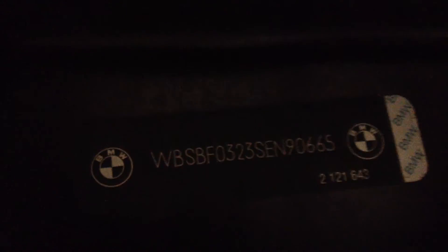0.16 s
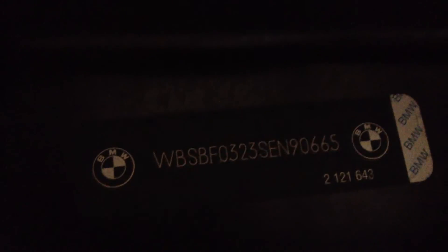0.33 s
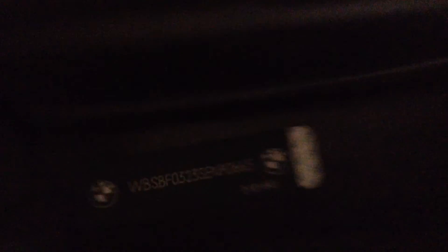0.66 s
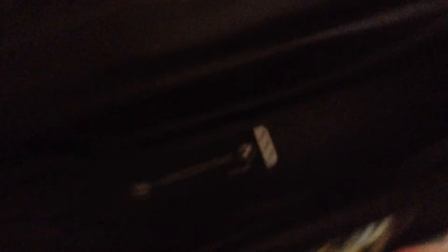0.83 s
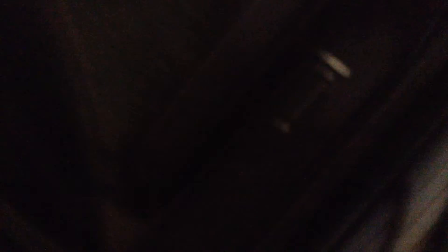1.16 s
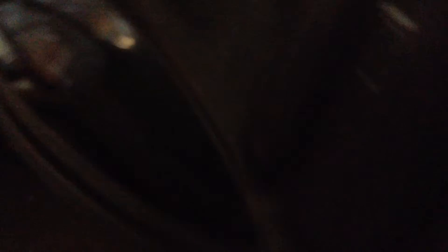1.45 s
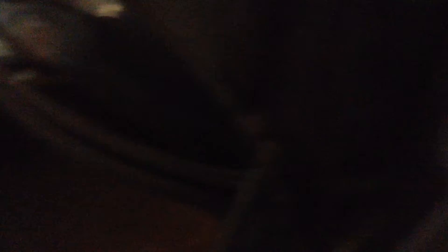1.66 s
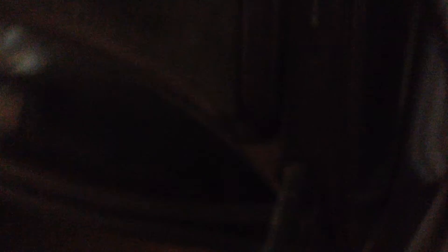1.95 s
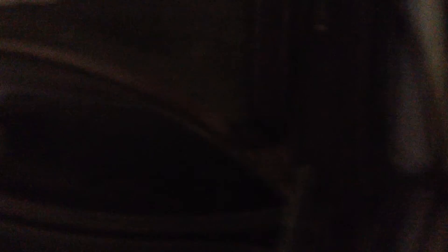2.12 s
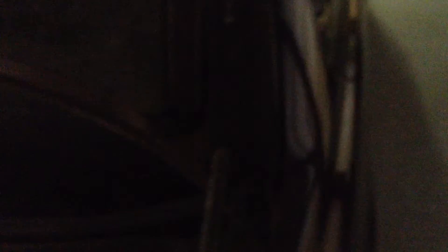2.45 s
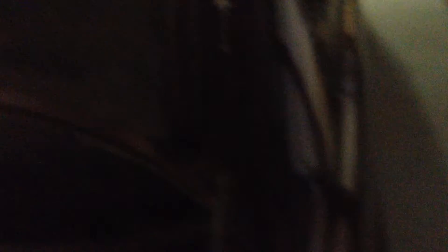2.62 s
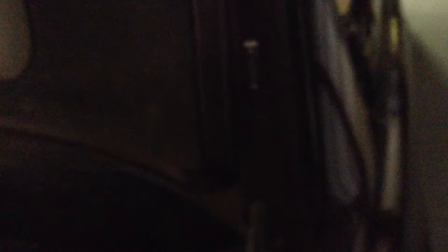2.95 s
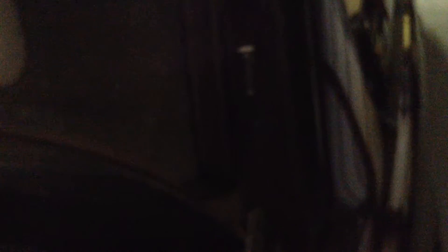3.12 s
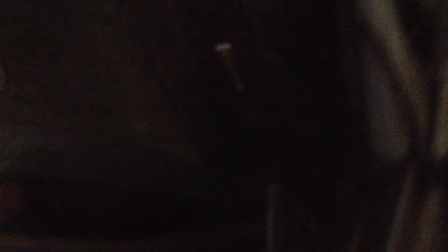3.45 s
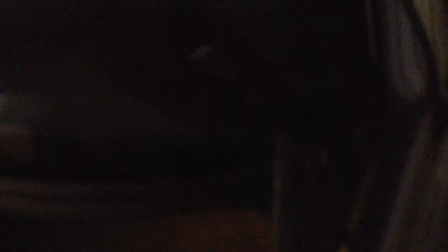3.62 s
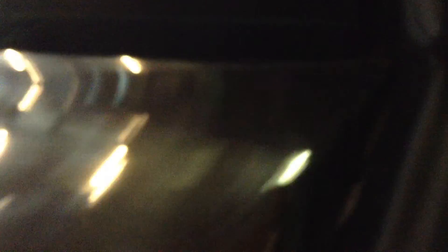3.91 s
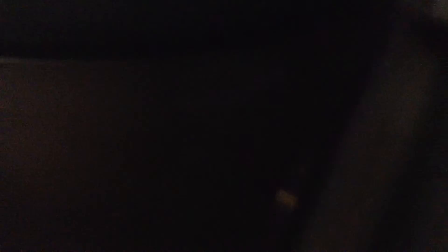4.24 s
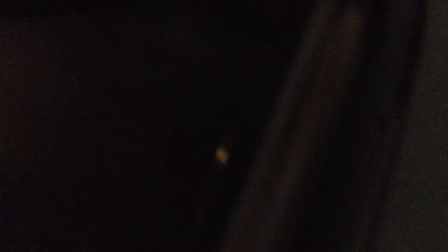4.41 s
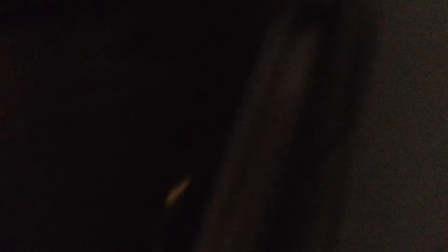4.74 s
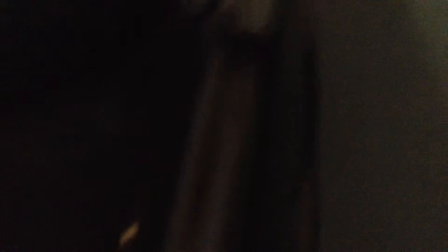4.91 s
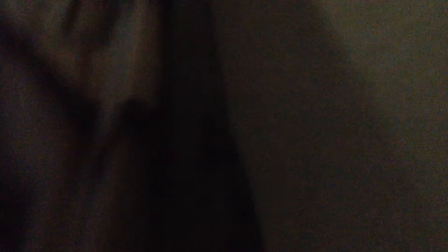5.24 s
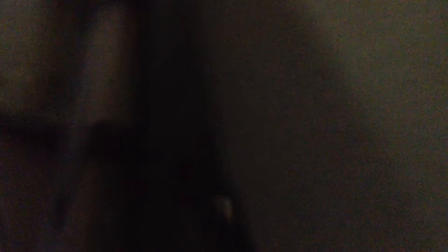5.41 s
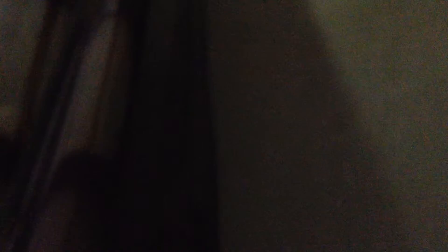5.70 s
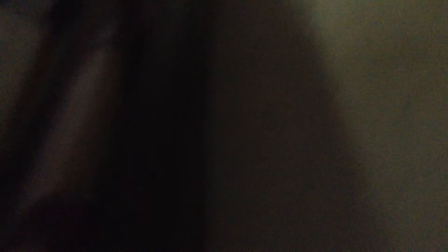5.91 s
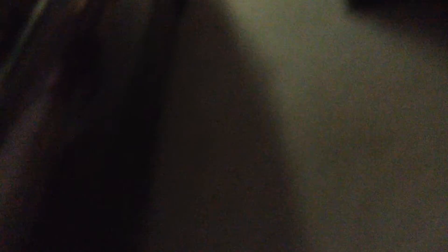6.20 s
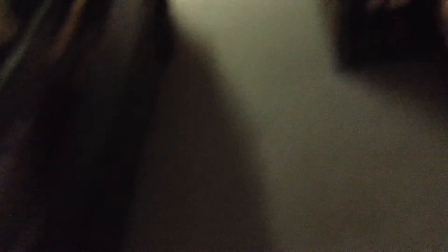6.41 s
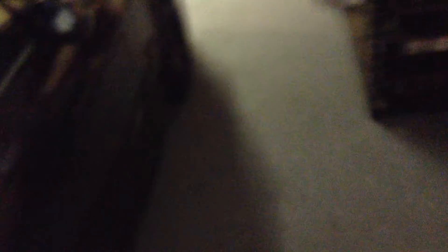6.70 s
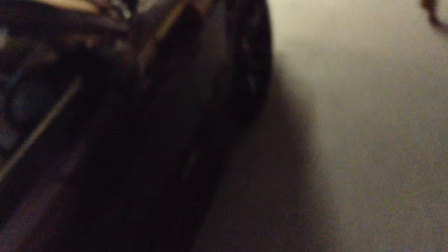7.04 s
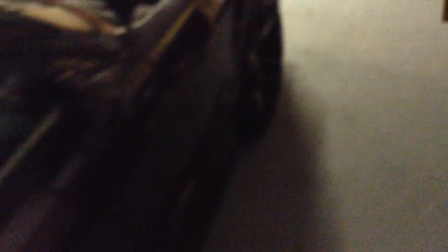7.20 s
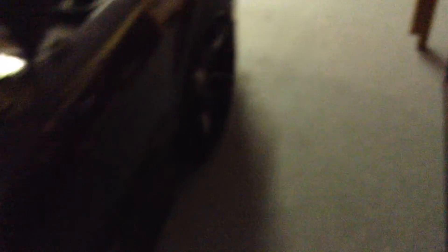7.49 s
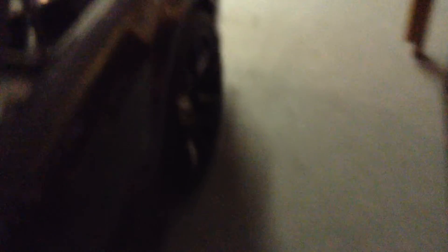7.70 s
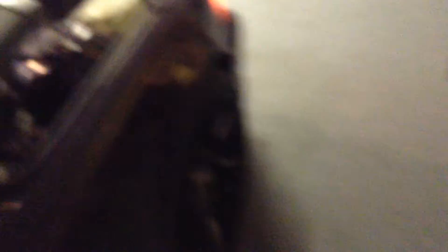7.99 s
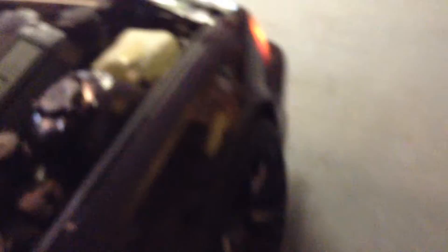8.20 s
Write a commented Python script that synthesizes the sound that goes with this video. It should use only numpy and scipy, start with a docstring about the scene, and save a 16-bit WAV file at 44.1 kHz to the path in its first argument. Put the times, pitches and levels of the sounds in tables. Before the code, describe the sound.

A six-cylinder car engine idles throughout, heard from a close, moving handheld microphone in a garage. From 0 s a low, humming exhaust drone pulses rapidly and a little unevenly, with a boxy panel buzz, block rumble, soft belt and intake hiss and a faint whine. Around 1.3 to 1.9 s a shoe scuffs the floor in several gritty drags, the strongest near 1.5 s, with thin squeaks. Two bright trim ticks come at about 3.7 and 3.9 s. At 4.3 s the car door slams: a very loud, tight cluster of latch cracks, metallic body ringing and a short garage tail, after which the idle seems briefly pushed down. From roughly 5.3 to 6.5 s the microphone moves out along the flank; the deep drone thins and fluctuates while fluttering hiss and airy engine bay noise become clearer, continuing until the end at 8.4 s.

```python
"""In a garage, close by a car's open door and then out along its flank, a six-cylinder engine idles.
Each firing strikes the exhaust and body resonances; shaped noise makes the gas, rumble and belt hiss, and
resonances and a crank-locked tone make a faint whine. Noise drags and squeaks scuff a shoe, bright bursts
tick twice in the trim, and the latch slams: cracks of noise, ringing door modes and a short garage tail."""
import sys
import numpy as np
from scipy import signal
from scipy.fft import rfft, irfft, next_fast_len
from scipy.io import wavfile

SR = 44100
rng = np.random.default_rng(int(sys.argv[2]) if len(sys.argv) > 2 else 0)


def master_out(mix):
    """Clip the mix to full scale and print it as 16-bit PCM to the path in sys.argv[1]."""
    frames = np.transpose(np.atleast_2d(mix))
    ceiling = np.clip(frames, -1, 1)
    pcm = np.round(ceiling * 32767).astype(np.int16)
    wavfile.write(sys.argv[1], SR, pcm)


N = 368676
LEAD = SR // 4   # samples of running-in before the start

# what the microphone's place does: (time [s], drone level [dB], second pipe against first [dB],
# standing wave near 225 Hz [dB], openness toward the engine bay [dB])
PLACE = [(0.0, -14.5, 3.5, -0.5, 0.5), (0.7, -15, 1.5, -2, 0.5), (1.39, -18, 0.5, -7.5, 1),
         (1.68, -16, 0, -3.5, .5), (2.09, -16.5, -1, -1.5, 0.5), (2.65, -16.5, -2, 3, 0.5),
         (4.1, -17.5, 1, -0.5, 0), (4.63, -16.5, -1, -0.5, 0), (5.26, -16.5, 2.5, 3.5, 0.5),
         (5.68, -19.5, 2.5, 5, 0.5), (6.12, -26.5, 6, 10.5, 1.5), (6.54, -30.5, 1.5, -0.5, 2),
         (7.22, -22, 0, 4, 3.5), (7.59, -21.5, -12.5, 1.5, 3), (7.99, -23, 0, -0.5, 4.5),
         (8.36, -26, 5, 9.5, 5.5)]
# one row a cylinder: (timing offset [ms], strength in each of the four pipes [dB] x 4)
CYLINDERS = [(-0.7, -26.5, -26, -37.5, -66), (-0.79, -26.5, -74, -77, -64), (-1.53, -30, -27.5, -38, -74),
             (-1.23, -28, -31, -49, -68), (-1.23, -29, -25, -48, -50.5), (-0.38, -26, -30.5, -43, -49.5)]
# blows of the door latch: (time [s], relative level at 2 kHz [dB], tilt [dB per octave])
LATCH = [(4.310, -12.5, 0.5), (4.318, -14, 1), (4.326, -12.5, 1.5), (4.337, -21, -6), (4.351, -31, 6.5)]

SILL_LEAVE_S, SILL_CLEAR_S = 0.49, 1.2   # the microphone draws back from the door sill
FLANK_FROM_S, FLANK_AT_S = 5.3, 6.1      # and steps out along the car's flank


def from_db(db):
    """Decibels to amplitude gain."""
    return 10 ** (np.asarray(db) / 20)


def rms_one(x):
    """Scale to unit rms."""
    return x / np.sqrt(np.mean(x ** 2) + 1e-20)


def in_time(rows, lead=0):
    """Table columns joined by straight lines, one value a sample."""
    s, *columns = np.transpose(rows)
    return [np.interp(np.arange(-lead, N) / SR, s, c) for c in columns]


def at_hz(points, hz):
    """Read a curve on a log-frequency axis."""
    point_hz, value = np.array(points).T
    return np.interp(np.log(hz), np.log(point_hz), value)


def ramp(start_s, end_s):
    """From 0 to 1 between two times."""
    return np.clip((np.arange(N) / SR - start_s) / max(end_s - start_s, 1e-3), 0, 1)


def drift(rate_hz):
    """Slow random wander of unit rms: low-passed noise made at every 40th sample, then joined up."""
    r = np.exp(-80 * np.pi * rate_hz / SR)
    noise = rng.standard_normal(N // 40 + 2002)
    slow = signal.lfilter([1], [1, -2 * r, r * r], noise)[2000:]
    return np.interp(np.arange(N) / 40, np.arange(len(slow)), rms_one(slow))


def resonate(x, hz, width_hz):
    """The same two-pole resonance twice, for dark valleys."""
    r = np.exp(-np.pi * width_hz / SR)
    row = [(1 - r * r) / 2, 0, (r * r - 1) / 2, 1, -2 * r * np.cos(2 * np.pi * hz / SR), r * r]
    return signal.sosfilt([row, row], x)


def ringing_noise(hz, width_hz):
    """Noise through a narrow resonance, unit rms."""
    return rms_one(resonate(rng.standard_normal(N), hz, width_hz))


def coloured(spectrum):
    """White noise shaped to a spectrum, falling away under its lowest point; unit rms."""
    size = next_fast_len(N)
    hz = np.maximum(np.arange(size // 2 + 1) * SR / size, 1)
    gain = from_db(at_hz(spectrum, hz)) * np.minimum(hz / spectrum[0][0], 1) ** 4
    return rms_one(irfft(rfft(rng.standard_normal(size)) * gain, size)[:N])


def heard(db, sill_db, flank_db, share):
    """Gain of an engine layer at the moving microphone: sill, flank, standing wave, wander of the hand."""
    wave_db = in_time(PLACE)[2]
    sill = 1 - ramp(SILL_LEAVE_S, SILL_CLEAR_S)
    flank = ramp(FLANK_FROM_S, FLANK_AT_S)
    return from_db(db + sill_db * sill + flank_db * flank + share * wave_db + 0.7 * drift(1.33))


def crank():
    """Four-stroke cycles (two turns each) counted from the start."""
    # crank speed: (time [s], speed [rpm])
    crank_speed = [(0.0, 717.2), (0.77, 727.4), (1.16, 757.0), (2.25, 743.7), (2.78, 735.3), (3.08, 747.6),
                   (3.49, 750.2), (4.03, 725.8), (4.31, 741.2), (4.52, 730.6), (5.0, 738.9), (5.33, 716.4),
                   (5.52, 738.3), (6.15, 759.9), (7.22, 745.5), (7.5, 736.8), (8.36, 752.4)]
    cycles = np.cumsum(in_time(crank_speed, lead=LEAD)[0] / 120) / SR
    return cycles - cycles[LEAD]


def firings(late_ms):
    """Six firings a cycle, each with its cylinder's timing offset and a random lateness or earliness."""
    cycles = crank()
    firing = np.arange(np.ceil(6 * cycles[0]), 6 * cycles[-1]).astype(int)
    cylinder = firing % 6
    offset_ms = np.array(CYLINDERS)[cylinder, 0] + late_ms * rng.standard_normal(len(firing))
    fired = np.interp(firing / 6, cycles, np.arange(N + LEAD)) + offset_ms * SR / 1000
    return fired, cylinder


def exhaust(fired, cylinder, uneven_db):
    """Each firing strikes four resonances of exhaust and body, after a path delay to each."""
    # exhaust and body resonances: (frequency [Hz], width of each pass [Hz], path delay [ms])
    pipes = [(160.25, 21.2, 0.02), (179.46, 18.3, 14.05), (233.2, 27, 25.52), (410.2, 18.4, 0.62)]
    # on the flank the cylinders sound more alike in the first three pipes
    sample = np.clip(fired - LEAD, 0, N - 1).astype(int)
    even = 0.66 * ramp(FLANK_FROM_S, FLANK_AT_S)[sample]
    silencer = signal.butter(2, 125, "high", fs=SR, output="sos")   # little passes below the pipes
    rings = []
    for k, (hz, width_hz, path_ms) in enumerate(pipes):
        strength = from_db(np.array(CYLINDERS)[cylinder, k + 1])
        if k < len(pipes) - 1:
            strength = strength + even * (strength.mean() - strength)
        at = np.maximum(np.round(fired + path_ms * SR / 1000).astype(int), 0)
        pulses = np.zeros(N + 2 * LEAD)
        pulses[at] = strength * from_db(uneven_db[k] * rng.standard_normal(len(fired)))
        ring = signal.sosfilt(silencer, resonate(pulses + 1e-18, hz, width_hz))
        rings.append((-1) ** k * ring[LEAD:LEAD + N])
    drone_db, second_db = in_time(PLACE)[:2]
    scale = np.std(rings[0] + rings[1])
    drone = from_db(drone_db) * (rings[0] + from_db(second_db) * rings[1]) / scale
    third = heard(db=-32, sill_db=-2, flank_db=-2.5, share=0.34) * rms_one(rings[2])
    fourth = heard(db=-39, sill_db=-2.5, flank_db=-0.5, share=0.09) * rms_one(rings[3])
    return drone + third + fourth


def engine_orders():
    """Pure tones at whole multiples of the cycle rate, locked to the crank."""
    # low tones: (multiple of the cycle rate, level [dB rms])
    low_orders = [(9, -69), (12, -65), (15, -82)]
    # upper tones, multiple of the cycle rate: (level clear of the sill [dB rms], change at the sill [dB],
    # change on the flank [dB], share of the standing wave)
    upper_orders = {18: (-64.5, -24, 19.5, 0.2), 36: (-42.5, -22, -2, 1.56), 39: (-31, 3, -3.5, .5)}
    turn = 2 * np.pi * crank()[LEAD:]
    tones = sum(from_db(db) * np.sin(k * turn) for k, db in low_orders)
    tones += sum(heard(*row) * np.sin(k * turn) for k, row in upper_orders.items())
    return np.sqrt(2) * tones


def panel(fired, cylinder):
    """A panel rings near 310 Hz, knocked hardest once a turn, and rattles with noise at the firing rate."""
    # how hard each cylinder's firing shakes the panel: (level [dB])
    panel_strikes = [-2, -13.5, -0.5, -7, -15, 0.5]
    knocks = np.zeros(N + 2 * LEAD)
    at = np.round(fired + 14.0 * SR / 1000).astype(int)   # 14 ms path
    strike_db = np.array(panel_strikes)[cylinder] + 1.5 * rng.standard_normal(len(fired))
    knocks[at] = from_db(strike_db)
    ring = rms_one(resonate(knocks + 1e-18, hz=307.3, width_hz=58)[LEAD:LEAD + N])
    stir = rng.standard_normal(N) * from_db(3.0 * np.cos(6 * 2 * np.pi * crank()[LEAD:]))
    rattle = from_db(-7) * rms_one(resonate(stir, hz=303.5, width_hz=81))
    return heard(db=-37.5, sill_db=4.5, flank_db=0.5, share=-0.48) * (ring + rattle)


def exhaust_gas():
    """Turbulent gas, as shaped noise, fills in between the orders and follows the drone."""
    # spectrum of the gas: (frequency [Hz], relative density [dB])
    gas_spectrum = [(30, -44), (100, -30), (140, -21), (185, -28), (240, 8.5), (300, -4.5), (420, 4),
                    (520, -39)]
    return from_db(in_time(PLACE)[0] - 22.5) * coloured(gas_spectrum)


def engine(uneven_db, late_ms):
    """The same firings drive the exhaust and the panel; crank tones and gas join them."""
    fired, cylinder = firings(late_ms)
    return exhaust(fired, cylinder, uneven_db) + engine_orders() + panel(fired, cylinder) + exhaust_gas()


def whine():
    """Narrow resonances of the ancillaries, and the alternator's tone following the crank through its belt."""
    # ancillary resonances: (frequency [Hz], width of each pass [Hz], relative level [dB])
    ancillaries = [(717, 36, -2.5), (2218, 144, -1), (6270, 350, -13)]
    rings = sum(from_db(db) * ringing_noise(hz, width_hz) for hz, width_hz, db in ancillaries)
    slip = 1.9 * drift(3.4)   # belt slip blurs the pitch
    alternator = np.sin(2 * np.pi * 199 * crank()[LEAD:] + slip)
    return rings + from_db(3.5 + 2.5 * drift(8.4)) * alternator


def engine_bay():
    """Block rumble, belt and intake hiss and higher air noise, fluttering together, over the whine."""
    # spectrum of the block's rumble: (frequency [Hz], relative density [dB])
    rumble_spectrum = [(260, 2), (450, 7.5), (640, -3), (692, -1), (1200, -1), (1340, -6), (2500, -29.5),
                       (3250, -39), (5500, -120)]
    # spectrum of the belt and intake hiss: (frequency [Hz], relative density [dB])
    hiss_spectrum = [(880, -29), (1500, -1), (1890, -2), (2270, -2.5), (2460, -1), (4450, -2.5), (4790, -3),
                     (6470, -2.5), (9000, -10.5), (11700, -21.5), (19800, -120)]
    # spectrum of the higher air noise: (frequency [Hz], relative density [dB])
    air_spectrum = [(5000, -39), (8500, -1), (11900, -2.5), (14200, -12.5), (15300, -13.5)]
    open_db = in_time(PLACE)[3]
    sill = 1 - ramp(SILL_LEAVE_S, SILL_CLEAR_S)
    # base level [dB], change at the sill [dB], share of the openness
    rumble_db = -41.5 + 4.8 * sill + 0.65 * open_db
    hiss_db = -41 + 0.28 * sill + 0.88 * open_db
    air_db = -51 - 1.5 * sill + 1.6 * open_db
    whine_db = -54 + 0.66 * open_db
    flutter = drift(6.0)
    rumble = from_db(rumble_db + 0.5 * flutter + 0.6 * drift(9.0)) * coloured(rumble_spectrum)
    hiss = from_db(hiss_db + 0.39 * flutter + 0.43 * drift(18.0)) * coloured(hiss_spectrum)
    air = from_db(air_db + 0.45 * flutter) * coloured(air_spectrum)
    return rumble + hiss + air + from_db(whine_db) * whine()


def garage_hum():
    """Low hum of the garage, as shaped noise, a little fainter out on the flank."""
    # spectrum of the hum: (frequency [Hz], relative density [dB])
    hum_spectrum = [(20, -6), (45, -6), (70, 7), (110, 6), (140, -16), (200, -50)]
    return from_db(-55.5 - 4 * ramp(FLANK_FROM_S, FLANK_AT_S)) * coloured(hum_spectrum)


def scuff():
    """Gritty drags of a shoe that rise, sag and fall away, with a ringing sole and its thin squeaks."""
    # spectrum of the drag: (frequency [Hz], relative density [dB])
    drag_spectrum = [(120, -30), (230, 0), (360, 8), (520, -2.5), (800, -13), (1200, -8), (1700, -15.5),
                     (2250, -12.5), (3200, -22), (5000, -41)]
    # drags over the floor: (time [s], level [dB], length [s])
    shoe_drags = [(1.303, -33.5, 0.054), (1.504, -25, 0.081), (1.628, -28.5, 0.053), (1.75, -34.5, .05)]
    # squeaks of the sole: (time [s], level [dB])
    sole_squeaks = [(1.33, -45), (1.55, -40), (1.66, -41)]
    rise_s, fall_s, sag_db, squeak_s = 0.041, 0.053, 3.5, 0.03
    t = np.arange(N) / SR
    drag = np.zeros(N)
    for s, db, long in shoe_drags:
        rise = ramp(s - rise_s, s) ** 2
        fall = np.exp(-np.maximum(t - s - long, 0) / fall_s)
        drag += from_db(db - sag_db * ramp(s, s + long)) * rise * fall
    peep = sum(from_db(db) * np.exp(-np.abs(t - s) / squeak_s) for s, db in sole_squeaks)
    grit = from_db(1.5 * drift(40.0))
    squeak = ringing_noise(hz=6580, width_hz=650)
    sole = from_db(-20) * ringing_noise(hz=2220, width_hz=160)
    return grit * (drag * (coloured(drag_spectrum) + sole) + peep * squeak)


def ticks():
    """Trim ticks: short high-passed noise bursts with a fast exponential decay."""
    # ticks of the trim: (time [s], nominal peak [dB], lowest frequency [Hz], t60 [s])
    trim_ticks = [(3.722, -32, 2980, 0.16), (3.873, -24, 4000, .03)]
    out = np.zeros(N)
    age = np.arange(SR // 4) / SR
    for s, db, low_hz, t60 in trim_ticks:
        # the noise peaks some 5 dB over its rms
        burst = rng.standard_normal(len(age)) * from_db(db - 5 - 60 * age / t60)
        start = round(s * SR)
        high_pass = signal.butter(2, low_hz, "high", fs=SR, output="sos")
        out[start:start + len(age)] += signal.sosfilt(high_pass, burst)
    return out


def power_decay(blows, t60):
    """Power that each blow adds and that dies by 60 dB in t60."""
    return signal.lfilter([1], [1, -from_db(-120 / (t60 * SR))], blows)


def slam(crack_t60, tail_db):
    """Each latch blow is a crack of noise; the garage answers with a tail that dies band by band."""
    # spectrum of the slam: (frequency [Hz], relative level [dB])
    slam_spectrum = [(150, -42), (250, -12), (313, -0.5), (384, -1.5), (489, -6), (542, -6), (655, -3.5),
                     (1220, -10.5), (1450, -7), (3190, -9), (4060, -10.5), (15300, -37.5)]
    # garage tail: (frequency [Hz], t60 [s])
    garage_tail = [(250, 1), (1000, 0.78), (4000, 0.47), (12000, 0.58)]
    start = round(LATCH[0][0] * SR) - 200
    out = np.zeros(N)
    edges = 180 * 2 ** np.arange(0, 6.6, 0.5)   # half-octave bands
    for low, high in zip(edges, edges[1:]):
        hz = np.sqrt(low * high)
        blows = np.zeros(SR)
        for s, db, tilt in LATCH:
            blows[round(s * SR) - start] = from_db(2 * (db + tilt * np.log2(hz / 2000)))   # power
        crack = power_decay(blows, crack_t60)
        tail = power_decay(blows, at_hz(garage_tail, hz))
        burst = rng.standard_normal(SR) * np.sqrt(crack + from_db(2 * tail_db) * tail)
        band_pass = signal.butter(2, [low, high], "band", fs=SR, output="sos")
        out[start:start + SR] += from_db(at_hz(slam_spectrum, hz) + 15) * signal.sosfilt(band_pass, burst)
    return out


def door():
    """The latch blows ring the door's modes, each blow with strengths of its own."""
    # door modes: (frequency [Hz], relative level [dB], t60 [s])
    door_modes = [(97, -30, 0.14), (197, -37, .2), (287.4, -30.5, 0.17), (389.8, -26, 0.24),
                  (488, -27, 0.14), (667, -22, 0.19), (1019, -26, 0.15), (2065, -23, 0.12),
                  (3450, -28, 0.055), (4240, -25, 0.056)]
    at = [round(s * SR) for s, db, tilt in LATCH]
    blow_db = np.array(LATCH)[:, 1] + 15
    out = np.zeros(N)
    for hz, level_db, t60 in door_modes:
        blows = np.zeros(N)
        blows[at] = from_db(blow_db + level_db + rng.normal(0, 2, len(at)))
        r, w = from_db(-60 / (t60 * SR)), 2 * np.pi * hz / SR
        out += signal.lfilter([0, np.sin(w)], [1, -2 * r * np.cos(w), r * r], blows + 1e-18)
    return out


def scene():
    """All sources at one microphone; its port thins the lows of the slam."""
    port = signal.butter(4, 108, "high", fs=SR, output="sos")
    bang = signal.sosfilt(port, door() + slam(crack_t60=0.095, tail_db=-14.5))
    car = engine(uneven_db=[1.14, 1.25, 2.2, 2.1], late_ms=0.18) + engine_bay()
    return (car + garage_hum() + scuff() + ticks() + bang)[None, :]


def gain_control(x):
    """Peaks over the knee pull the gain down by a share of their excess; it creeps back."""
    knee_db, share, attack_s = -6, 0.55, 0.071
    creep = 2.5 * np.arange(N) / SR   # the held excess shrinks by 2.5 dB a second
    over = np.maximum(20 * np.log10(np.abs(x) + 1e-9) - knee_db, 0)
    held = np.maximum.accumulate(over + creep, axis=-1) - creep
    r = np.exp(-1 / (attack_s * SR))
    smooth = signal.lfilter([1 - r], [1, -r], held)
    return x * from_db(-share * smooth)


def roll_off(x):
    """The treble ends steeply here."""
    return signal.sosfilt(signal.butter(12, 15430, fs=SR, output="sos"), x)


def record(dry):
    """Gain control, a soft limit that mainly rounds the highest peaks, and a cut of the top."""
    held = gain_control(dry)
    rounded = held / (1 + (held / 0.72) ** 6) ** (1 / 6)
    top_cut = signal.cheby2(10, 60, 16500, fs=SR, output="sos")
    finished = signal.sosfilt(top_cut, rounded)
    return roll_off(finished)


dry = scene()
out = record(dry)
master_out(out)
```